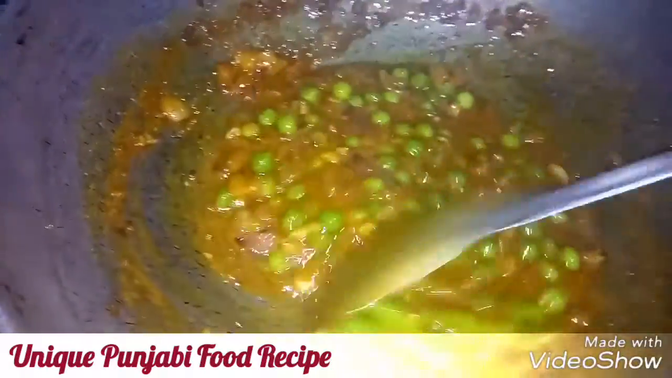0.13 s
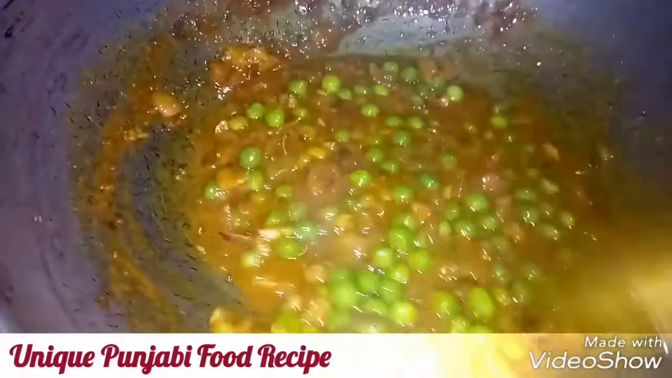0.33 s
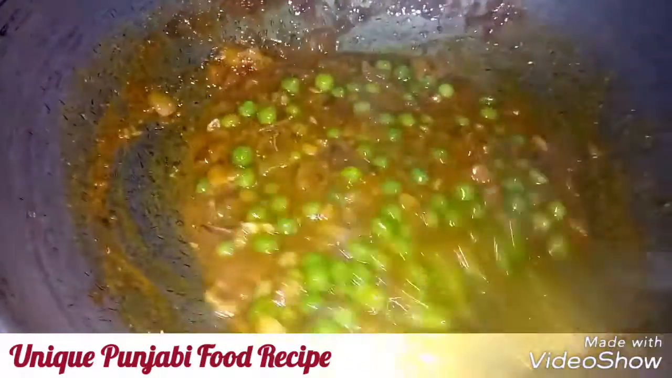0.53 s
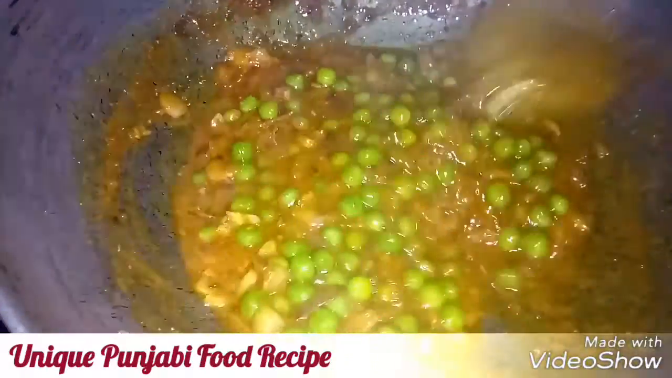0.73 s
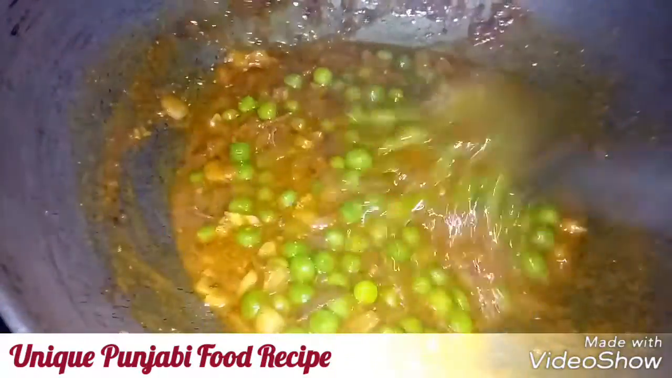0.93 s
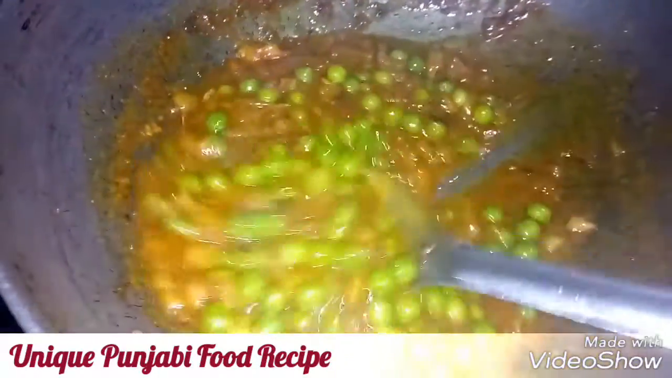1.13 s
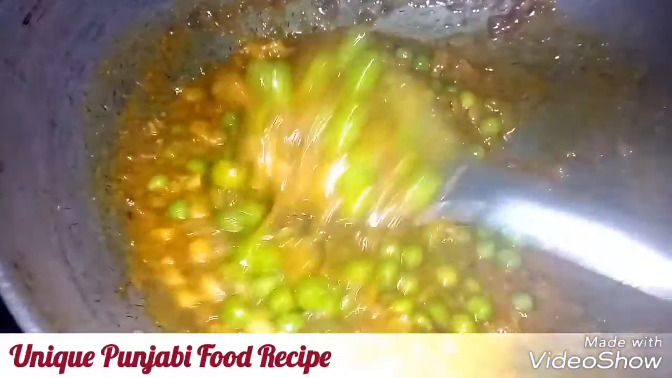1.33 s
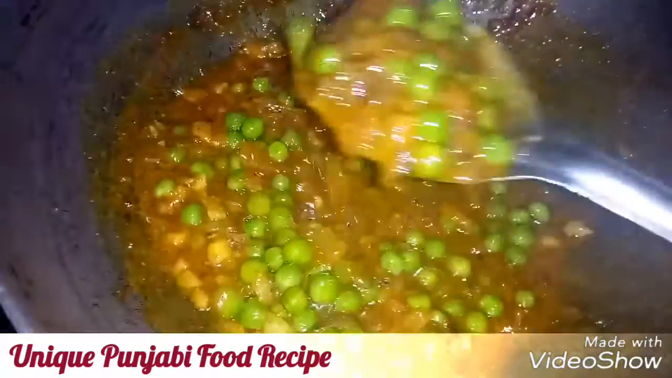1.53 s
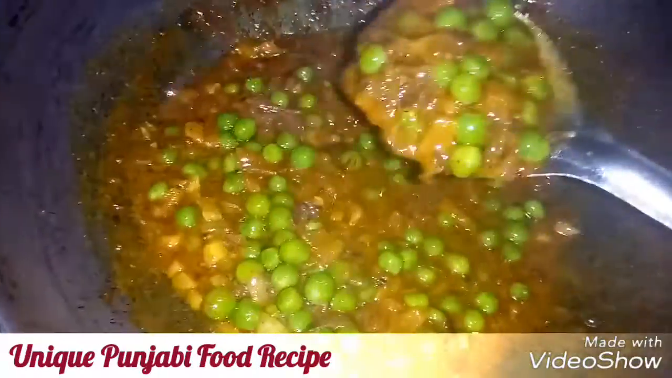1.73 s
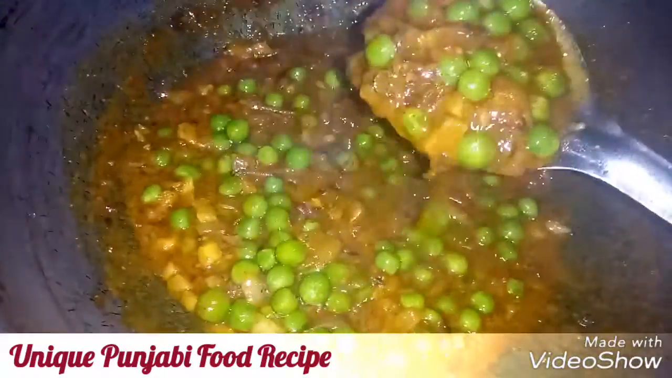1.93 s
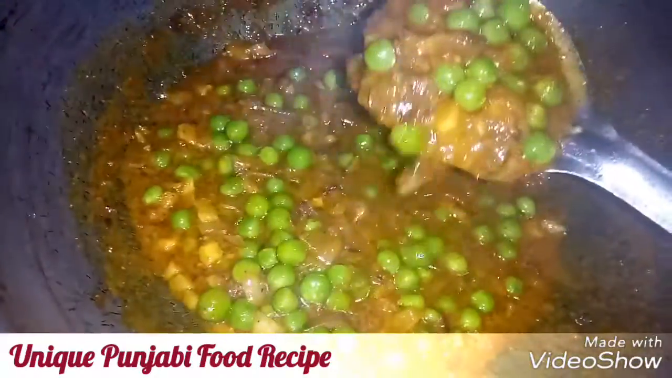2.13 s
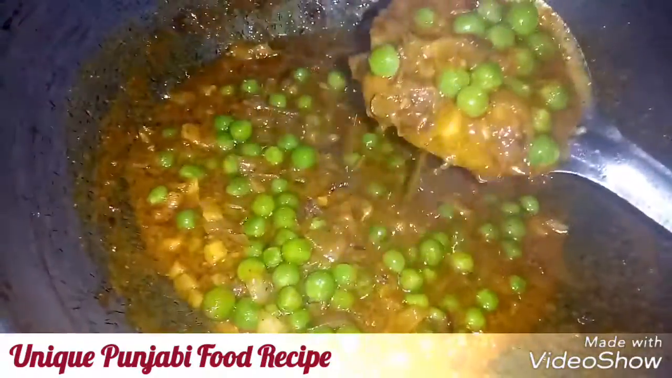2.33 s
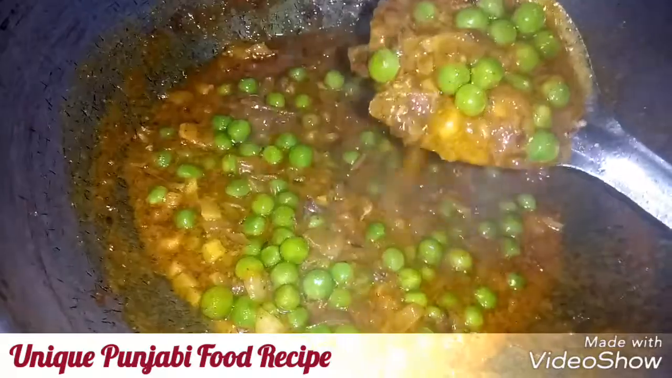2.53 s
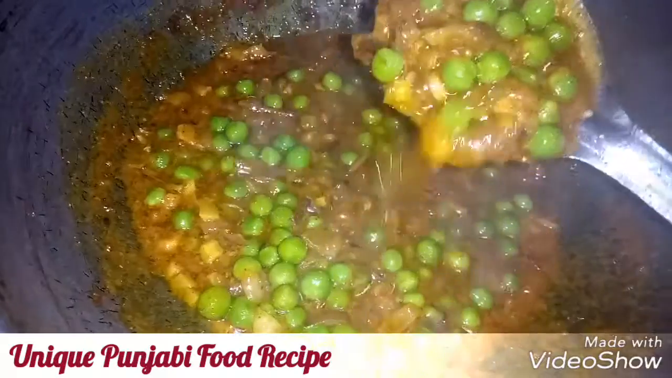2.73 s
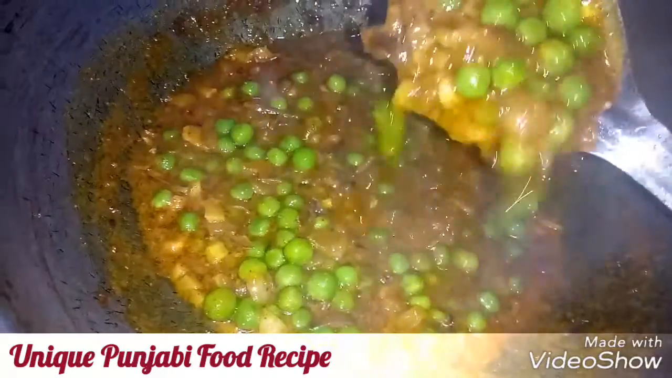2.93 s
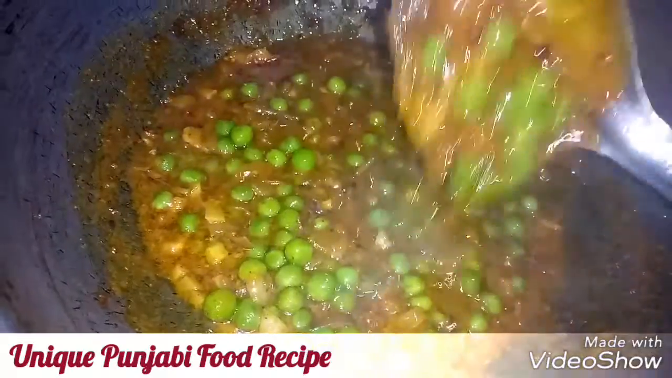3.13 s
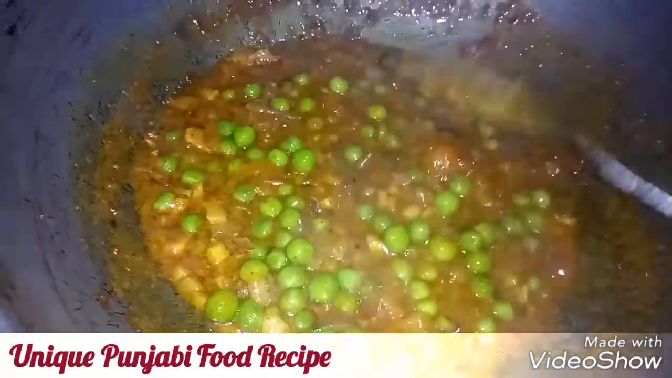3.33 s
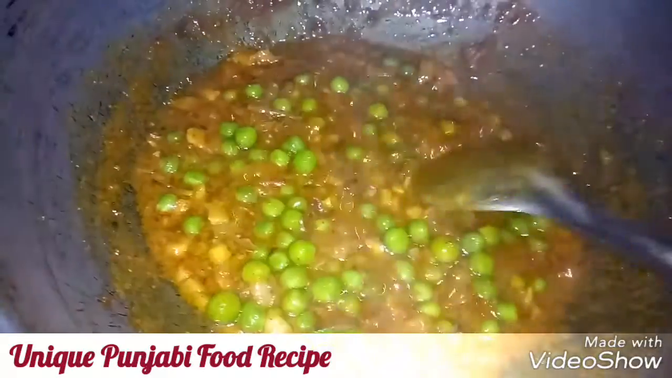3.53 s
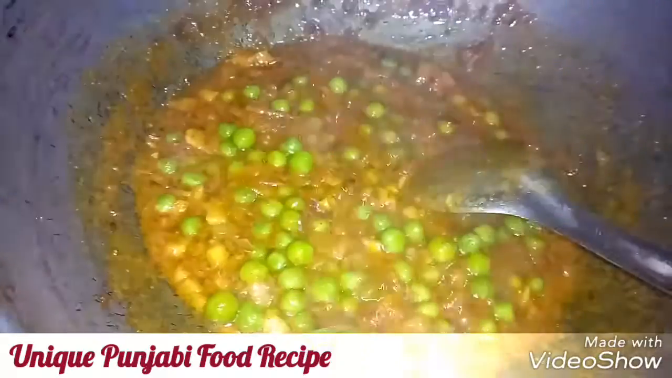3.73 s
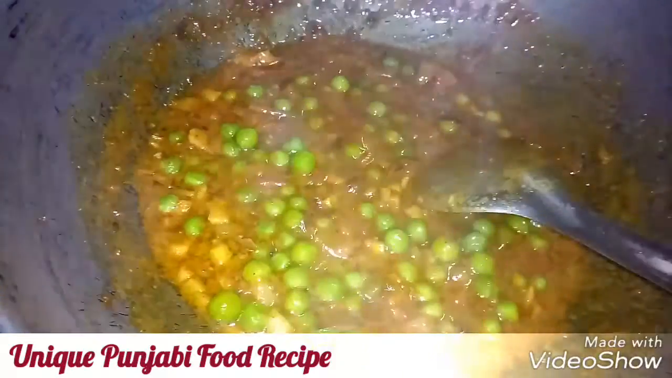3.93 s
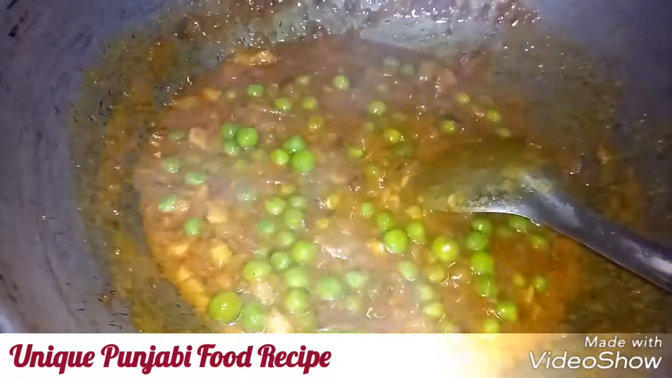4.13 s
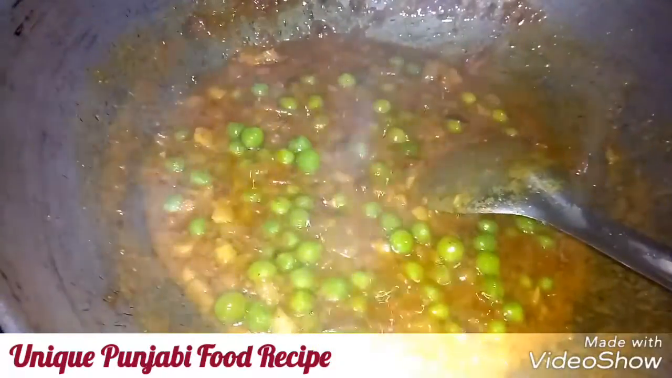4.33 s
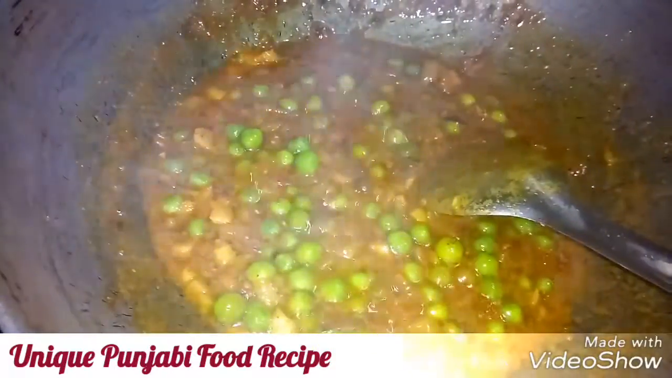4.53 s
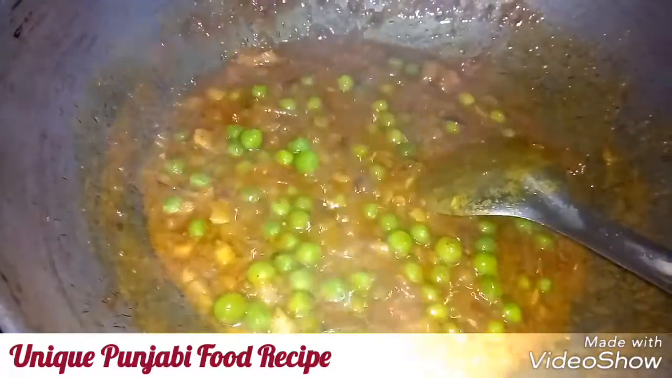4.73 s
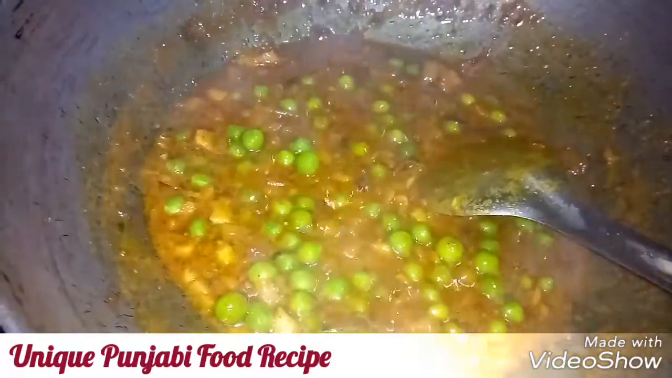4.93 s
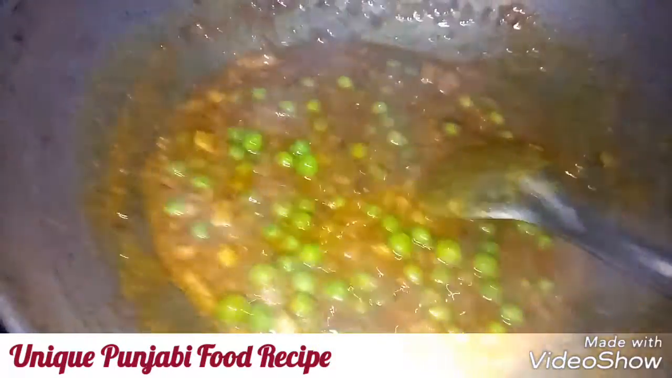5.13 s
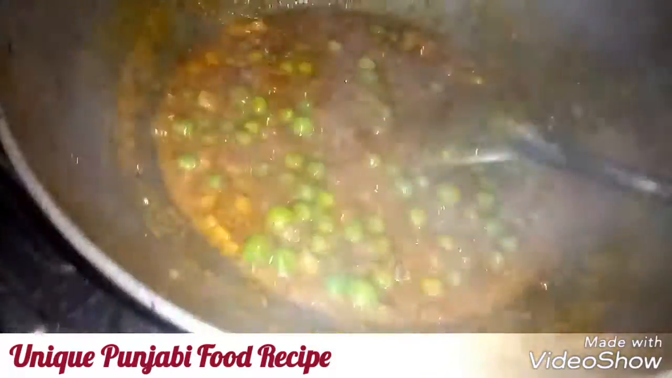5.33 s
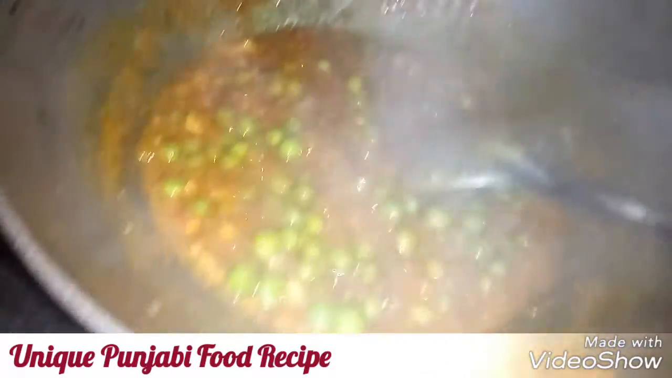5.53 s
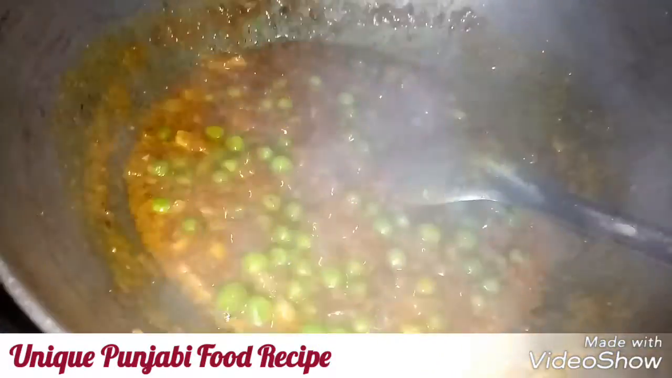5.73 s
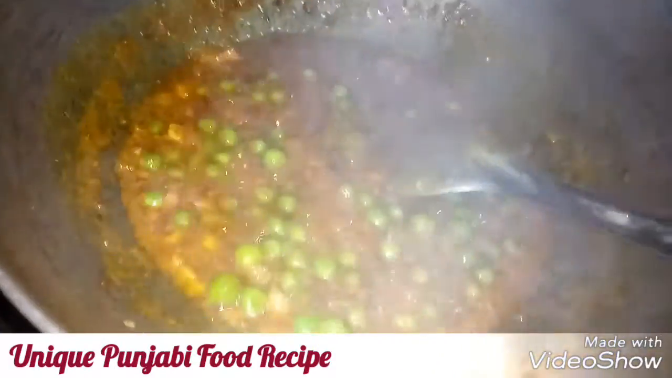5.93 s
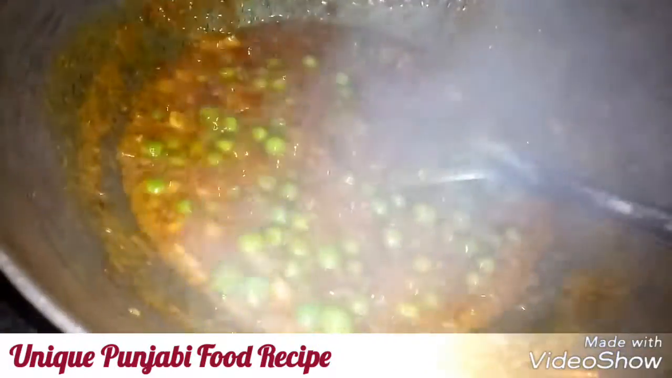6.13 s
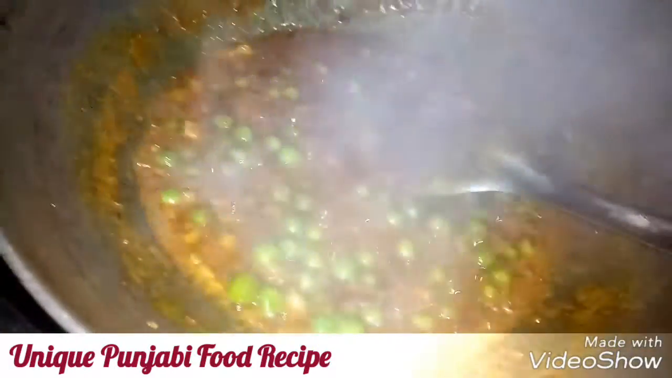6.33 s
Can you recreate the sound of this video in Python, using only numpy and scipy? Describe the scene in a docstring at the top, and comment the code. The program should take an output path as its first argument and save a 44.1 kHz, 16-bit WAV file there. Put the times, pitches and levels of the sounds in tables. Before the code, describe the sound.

Close to a metal pan in a small kitchen, a steel spoon scrapes briefly with a slight squeal, then clanks brightly and drags in gritty strokes through thick gravy. A soft sizzle swells during stirring. After a quieter pause with faint hiss, the spoon clinks down and chatters again, and wet bubbles burst and pop in quick clusters. Thin steam whistles and a low hum come near the end.

```python
"""Kitchen, close to a pan: a steel spoon knocks, chatters and scrapes on deep metal holding thick gravy.
Knocks are clicks plus decaying modes; scrapes are modes driven by gritty noise, with narrow tones and a squeal.
The gravy simmers as uneven shaped noise, swelling at moments, some of them during the stirring, with resonant
bubble bursts, pops, ticks and thin steam whistles. The room adds hiss, rumble, a low hum that comes up twice
and a short reverberation. Nearly mono: a faint grain parts the two channels."""
import sys
import numpy as np
from scipy import signal
from scipy.fft import rfft, irfft, next_fast_len
from scipy.io import wavfile
from scipy.ndimage import uniform_filter1d, map_coordinates

SR = 44100
rng = np.random.default_rng(int(sys.argv[2]) if len(sys.argv) > 2 else 0)


def to_wav(sig):
    """Store sig (one row per channel, or 1-D mono) as 16-bit WAV at the path in sys.argv[1].

    Samples outside -1..1 are clipped; the rate is SR.
    """
    pcm = np.clip(np.atleast_2d(sig), -1, 1) * 32767
    pcm = np.round(pcm).astype(np.int16)
    wavfile.write(sys.argv[1], SR, pcm.T)  # frames by channels


def gain_from_decibels(decibels):
    """Convert decibel values to linear amplitude factors."""
    exponent = np.asarray(decibels, float) / 20
    return 10 ** exponent


N = 280917
TIME = np.arange(N) / SR
LOW_MODES_TOP_HZ = 2600

# Spoon contacts. Each row: start in s, ring peak in dB, favoured pitch in Hz, t60 of the added damping in s,
# click level in dB.
CONTACTS = [(.096, -35, 5140, .05, -46), (0.106, -48, 1070, 0.063, -44), (0.134, -48, 4470, .06, -46),
            (0.6452, -15, 2357, 0.06, -43), (.6475, -16.5, 5280, 0.051, -17), (0.669, -31, 2310, .06, -31),
            (.68, -32, 3970, 0.059, -36), (.692, -35, 6160, .05, -40), (0.699, -36, 6160, .06, -38),
            (0.717, -35, 2310, .05, -39), (0.7232, -35, 1830, .06, -34), (0.727, -33, 5470, .06, -44),
            (0.742, -42, 1850, 0.035, -46), (0.9854, -33, 1465, 0.11, -39), (1.055, -44, 6300, .04, -46),
            (1.085, -44, 6000, .05, -51), (1.281, -42, 1900, 0.05, -46), (3.5975, -39, 2320, 0.04, -54),
            (3.602, -29, 2320, 0.05, -54), (3.602, -15, 5550, 0.029, -21.5), (3.61, -33, 5400, .06, -44),
            (3.616, -42, 3750, .6, -55), (3.718, -45, 920, .03, -40), (3.728, -42, 4900, .04, -44),
            (3.7332, -37, 3250, .04, -13.5), (3.736, -41, 6250, .06, -40), (3.753, -38, 3530, .04, -29)]
# Modes of spoon and pan. Each row: frequency in Hz, relative level in dB, t60 in s before the hold factor.
STEEL_MODES = [(1207, -10, 0.057), (1465, -13, 0.032), (1840, -10, 0.11), (2310, -2.5, 0.04),
               (2860, -6, 0.081), (2980, -5, 0.17), (3200, 0, 0.057), (3750, -7, 0.35), (3970, 7.5, 0.025),
               (4500, -6, 0.12), (4776, 8, 0.025), (5280, -0.5, 0.11), (5530, -13, 0.34), (5780, -13, 0.11),
               (6250, 9.5, 0.04), (6180, 2, 0.07), (6480, 6.5, 0.07), (6910, -10, 0.11), (7150, 0, 0.12),
               (7780, -11, 0.1), (8740, -7.5, 0.068), (10900, -13, 0.066), (10900, -34, 0.033),
               (13600, -16, 0.034), (14900, -31, 0.037)]
# Modes of the pan's low body. Each row: frequency in Hz, relative level in dB, t60 in s before the hold factor.
BODY_MODES = [(230.5, 4, 0.27), (306.2, 3, 0.15), (398, 6, 0.066), (500, 5, .05), (690, -1, 0.07)]


def unit(x):
    """Scaled to rms 1."""
    return x / np.sqrt(np.mean(x ** 2) + 1e-20)


def curves(rows):
    """One value per sample for each column after the time."""
    s, *cols = np.transpose(rows)
    return [np.interp(TIME, s, c) for c in cols]


def wobble(rate_hz):
    """Smooth random curve with rate_hz knots a second."""
    knots = rng.standard_normal(int(N * rate_hz / SR) + 4)
    return map_coordinates(knots, [TIME * rate_hz])


def coloured(x, spectrum):
    """x filtered by gains at (Hz, dB) points, interpolated on a log frequency axis."""
    m = next_fast_len(len(x) + 8192)
    hz, db = np.transpose(spectrum)
    gain_db = np.interp(np.log(np.fft.rfftfreq(m, 1 / SR) + 1), np.log(hz), db)
    return irfft(rfft(x, m) * gain_from_decibels(gain_db), m)[:len(x)]


def grit(spiky_db, patchy_db):
    """Noise of uneven grains, with time-frequency patches of random gain."""
    grains = rng.standard_normal(N + 512) * gain_from_decibels(spiky_db * rng.exponential(size=N + 512))
    z = signal.stft(grains, nperseg=256)[2]
    field = uniform_filter1d(uniform_filter1d(rng.standard_normal(z.shape), 4, 0), 12, 1)
    return signal.istft(z * gain_from_decibels(patchy_db * unit(field)), nperseg=256)[1][:N]


def ring(modes, weight_db=0, hold=1, phase=0):
    """Answer of a set of modes to one blow: decaying sines, t60 times hold, phase in cycles."""
    hz, db, t60 = np.transpose(modes)[:, :, None]
    t = TIME[:SR // 3]
    decay = gain_from_decibels(db + weight_db - 60 * t / (t60 * hold))
    return np.sum(decay * np.sin(2 * np.pi * (hz * t + phase)), axis=0)


def hiss():
    """Room hiss of patchy noise plus a faint, very patchy high hiss."""
    # Each row: frequency in Hz, relative density in dB.
    room_spectrum = [(120, -10.5), (200, -4.5), (303, -4.5), (408, -3), (488, -2), (1270, -2), (1430, -4),
                     (1860, -4), (7000, -46), (9100, -72.5), (15400, -120)]
    # Each row: frequency in Hz, relative density in dB.
    air_spectrum = [(6000, -38), (7500, -9), (10000, -0.5), (13500, -9), (15000, 3), (15800, -5),
                    (16500, -56)]
    room = gain_from_decibels(-66.5 + 0.47 * wobble(11.0)) * unit(coloured(grit(0, 2.45), room_spectrum))
    return room + gain_from_decibels(-94.0) * unit(coloured(grit(0, 10.0), air_spectrum))


def rumble():
    """Low noise made lumpy by two random level curves, over a slow level course."""
    # Each row: frequency in Hz, relative density in dB.
    rumble_spectrum = [(15, -44), (25, -34), (54, -1), (75, -6.5), (107, 4), (135, -5), (173, 0.5),
                       (201, -12), (241, -11.5), (303, -6), (330, -18.5), (430, -29), (730, -120)]
    # Each row: time in s, level in dB.
    rumble_course = [(0, -67), (1.4, -64.5), (2.4, -67.5), (2.9, -67), (3.25, -63.5), (3.5, -66),
                     (4.2, -67), (5.25, -62.5), (5.55, -66.5), (6.37, -68.5)]
    lumps_db = 1.2 * wobble(2.6) + 0.95 * wobble(6.5)
    noise = unit(gain_from_decibels(lumps_db) * coloured(grit(0, 0), rumble_spectrum))
    return gain_from_decibels(curves(rumble_course)[0]) * noise


def hum():
    """Low sine with a two-partial drone, gated on twice: the first stops abruptly, the second lasts to the end."""
    # Each row: start in s, rise in s, end in s, mean pitch in Hz, mean hum level in dB, drone gain in dB.
    hum_rows = [(4.9, 0.034, 5.352, 52.5, -65.5, -74), (5.4, 0.24, 6.5, 50.1, -62.5, -66)]
    cut_s = 0.0089
    turns = np.cumsum(109 + 2.48 * wobble(11)) / SR
    partials = np.sin(2 * np.pi * turns) + 0.31 * np.sin(3 * np.pi * turns)
    drone = gain_from_decibels(2.0 * wobble(12)) * partials
    out = np.zeros(N)
    for start, rise, end, hz, db, drone_db in hum_rows:
        gate = np.clip(np.minimum((TIME - start) / rise, (end - TIME) / cut_s), 0, 1) ** 2
        cycles = np.cumsum(hz + .5 * wobble(3.94)) / SR
        tone = np.sqrt(2) * gain_from_decibels(db + 0.9 * wobble(9)) * np.sin(2 * np.pi * cycles)
        out += gate * (tone + gain_from_decibels(drone_db) * drone)
    return out


def fizz():
    """Fine sizzle of gritty noise that swells unevenly."""
    # Each row: time in s, level in dB.
    fizz_course = [(0, -60), (.2, -69), (.62, -68), (.83, -62.5), (1.03, -69), (1.21, -55), (1.5, -64.5),
                   (1.95, -68), (3.2, -65.5), (3.64, -65.5), (3.78, -73), (3.9, -62.5), (5.5, -63.5),
                   (6.37, -65)]
    # Each row: frequency in Hz, relative density in dB.
    fizz_spectrum = [(1060, -39), (1800, -7), (2060, -1.5), (3130, 0.5), (4350, 0.5), (5510, 0),
                     (6370, -2.5), (8140, -21.5), (13500, -29.5), (15100, -18), (15800, -40)]
    swell = gain_from_decibels(.5 * wobble(12) + 1.1 * wobble(40))
    return gain_from_decibels(curves(fizz_course)[0]) * unit(swell * coloured(grit(1.8, 1.6), fizz_spectrum))


def wet_resonance(puff, hz):
    """Spiky noise narrowed to a peak at hz, as a bursting bubble sounds."""
    peak = [(hz * .6, -70), (hz * .85, -16), (hz, 0), (hz * 1.15, -16), (hz * 1.4, -70)]
    return unit(coloured(puff, peak))


def bursts():
    """Runs of bubbles bursting in the gravy: spiky noise through two wet resonances, plus a broad splash."""
    # The loudest runs. Each row: start in s, length in s, level before shaping in dB,
    # low resonance in Hz, high resonance in Hz.
    loud_runs = [(0.267, 0.025, -69, 2700, 4860), (2.53, 0.058, -73, 3450, 4800),
                 (3.829, 0.048, -65, 3050, 4850), (3.926, 0.05, -61.5, 3280, 5530),
                 (4.005, 0.08, -68, 3120, 5800), (4.125, 0.049, -60, 3130, 6060),
                 (4.282, 0.052, -64, 3420, 5950), (4.408, .03, -66, 3130, 5250),
                 (4.48, 0.027, -70, 2740, 4800), (4.578, 0.045, -62, 3600, 4900),
                 (4.755, .035, -67, 4200, 5600), (4.32, .04, -70, 2900, 6200),
                 (4.658, 0.028, -65, 3960, 5400), (4.846, 0.13, -67, 3000, 5100),
                 (4.95, 0.038, -70, 3260, 5300), (5.035, 0.15, -66.5, 3200, 5430),
                 (5.31, 0.034, -67.5, 3500, 6340), (5.41, .035, -70, 3250, 3600),
                 (5.872, .02, -70, 3350, 4470)]
    # Each row: frequency in Hz, relative density in dB.
    splash_spectrum = [(1500, -48), (2500, 4), (6500, 13), (7600, -8), (16000, -43)]
    high_over_low_db, flutter_db = -0.5, 2
    # smaller runs at random times as the spoon comes to rest and after
    from_s, to_s = 3.85, 5.9
    small_runs = [(from_s + a * (to_s - from_s), 0.033 * (0.61 + b), -74,
                   3350 * (0.77 + 0.18 * c), 5100 * (0.96 + 0.4 * d))
                  for a, b, c, d in rng.random(size=(12, 4))]
    out, t = np.zeros(N + SR), TIME[:SR // 8]
    flutter = np.pad(gain_from_decibels(flutter_db * wobble(260)), (0, SR))
    for s, length, db, low_hz, high_hz in loud_runs + small_runs:
        on = slice(round(s * SR), round(s * SR) + len(t))
        puff = rng.standard_normal(len(t)) * gain_from_decibels(3.2 * rng.exponential(size=len(t)))
        splash = 0.46 * unit(coloured(puff, splash_spectrum))
        low, high = wet_resonance(puff, low_hz), wet_resonance(puff, high_hz)
        voice = splash + low + gain_from_decibels(high_over_low_db) * high
        shape = np.sin(np.pi * np.clip(t / length, 0, 1) ** 0.63) ** 0.87 * flutter[on]
        out[on] += gain_from_decibels(db) * abs(shape) * voice
    return out[:N]


def pops():
    """Single pops: very short sine pulses."""
    # Each row: start in s, envelope peak in dB, pitch in Hz.
    pop_rows = [(3.334, -46, 5000), (3.412, -45, 2100), (3.449, -54, 2500), (4.136, -54, 6110),
                (4.2923, -48.5, 3550), (3.9375, -48, 5350), (4.678, -49, 5200), (4.728, -52, 5300),
                (4.8465, -52, 4500), (4.299, -54, 6000), (4.3126, -50, 6100), (4.5832, -45, 4800),
                (4.9078, -53, 3200), (5.0617, -49, 5530), (5.08, -41, 3060), (5.095, -44, 3500),
                (5.1327, -47, 5590)]
    to_peak_s = 0.0004
    out, t = np.zeros(N + SR), TIME[:SR // 8]
    envelope = t / to_peak_s * np.exp(1 - t / to_peak_s)
    for s, db, hz in pop_rows:
        out[round(s * SR):][:len(t)] += gain_from_decibels(db) * envelope * np.sin(2 * np.pi * hz * t)
    return out[:N]


def ticks():
    """Thin high ticks: millisecond puffs of treble noise."""
    # Each row: start in s, peak in dB.
    tick_rows = [(3.053, -49), (3.3343, -58)]
    spectrum = [(9000, -40), (13000, -6), (15000, -2), (16400, -6), (16800, -60)]
    out, t = np.zeros(N + SR), TIME[:SR // 8]
    for s, db in tick_rows:
        noise = coloured(rng.standard_normal(len(t)), spectrum)
        tick = np.exp(-((t - .002) / 0.0011) ** 2) * noise
        out[round(s * SR):][:len(t)] += gain_from_decibels(db) * tick / abs(tick).max()
    return out[:N]


def wheezes():
    """Narrow unsteady whistles that slide as steam escapes."""
    # Each row: start in s, end in s, first pitch in Hz, last pitch in Hz, level before flutter in dB.
    wheeze_rows = [(5.53, 5.6, 4450, 4700, -71), (5.595, 5.69, 4100, 3950, -70),
                   (5.705, 5.74, 3700, 3450, -72)]
    out, waver, flutter = np.zeros(N), wobble(120), wobble(90)
    for start, end, from_hz, to_hz, db in wheeze_rows:
        u = np.clip((TIME - start) / (end - start), 0, 1)
        hz = from_hz + (to_hz - from_hz) * u + 70 * waver
        shape = gain_from_decibels(db + 4 * flutter) * np.sin(np.pi * u) ** .5
        out += shape * np.sin(2 * np.pi * np.cumsum(hz) / SR)
    return out


def walls(x):
    """Room answer: noise whose frequencies each die at their own speed, 200 samples late."""
    # Each row: frequency in Hz, t60 in s.
    wall_decay = [(300, 0.25), (3000, 0.44), (10000, 0.051)]
    hz, t, z = signal.stft(rng.standard_normal(SR // 2), SR, nperseg=256)
    t60 = np.interp(hz, *np.transpose(wall_decay))[:, None]
    tail = signal.istft(z * gain_from_decibels(-60 * t / t60), SR, nperseg=256)[1]
    return signal.fftconvolve(np.pad(x, (200, 0)), tail / np.linalg.norm(tail))[:N]


def squeal():
    """The handle sings in the first stroke: a rough tone that sags in pitch."""
    # Each row: time in s, mean pitch in Hz, level before roughness in dB.
    squeal_course = [(0, 1180, -53), (.05, 1200, -55), (.08, 1080, -54), (.088, 1070, -66),
                     (.105, 1030, -51), (.122, 1030, -53), (.14, 1006, -75)]
    hz, db = curves(squeal_course)
    cycles = np.cumsum(hz + 75 * wobble(130)) / SR
    return (TIME < squeal_course[-1][0]) * gain_from_decibels(db + 4 * wobble(90)) * np.sin(2 * np.pi * cycles)


def narrow_tones():
    """Narrow fluttering tones, mostly modes of the dragged edge, some thin treble lines, one late over the simmer."""
    # Each row: start in s, start of the fade in s, mean pitch in Hz, level before flutter in dB.
    tone_rows = [(0, 0.087, 6170, -61), (.04, 0.078, 5640, -55.5), (0, .06, 4930, -59),
                 (.04, 0.154, 315.4, -64), (.097, 0.15, 6080, -50), (.128, .15, 4460, -56),
                 (.125, 0.143, 4820, -56), (.669, .675, 2310, -44), (.681, .691, 2300, -43),
                 (.7, .721, 2280, -44), (.7, .72, 3200, -50), (.695, .72, 1570, -48),
                 (.669, .695, 5230, -46), (.68, .703, 3980, -44.5), (.69, 0.72, 6250, -46),
                 (.705, 0.739, 1105, -49.5), (.722, 0.732, 1800, -42), (.724, 0.739, 5620, -42),
                 (.722, 0.739, 4920, -46), (.76, 0.807, 4850, -59), (.982, 1.065, 236, -64.5),
                 (1, 1.025, 390, -67), (1.275, 1.29, 210, -62), (1.16, 1.178, 308, -63),
                 (3.63, 3.69, 980, -67), (3.61, 3.67, 2300, -62), (3.64, 3.71, 5500, -62),
                 (.13, .15, 4050, -58), (.095, .115, 4900, -58), (.01, .05, 3070, -58),
                 (1.1, 1.3, 231.3, -64), (1.06, 1.1, 6070, -62), (1.19, 1.264, 4700, -61),
                 (1.2, 1.26, 2130, -64), (1.3, 1.358, 1902, -66), (1.32, 1.35, 5600, -63),
                 (3.617, 3.68, 3750, -57), (3.72, 3.76, 10900, -69), (3.715, 3.76, 9100, -71),
                 (.655, .745, 10800, -66), (4.87, 4.99, 3250, -70), (3.63, 3.65, 2990, -61),
                 (3.61, 3.645, 5360, -55), (3.665, 3.717, 6240, -59), (3.66, 3.71, 4500, -64),
                 (3.728, 3.745, 6240, -48), (3.735, 3.743, 5740, -43)]
    rise_s, t60_s, flutter_db = 0.0016, .04, 3.5
    out, t = np.zeros(N + SR), TIME[:SR // 2]
    for start, end, hz, db in tone_rows:
        flutter, waver = map_coordinates(rng.standard_normal(300), [[t * 220, 130 + t * 300]])
        fall_db = 60 * np.maximum(t - end + start, 0) / t60_s
        shape = np.clip(t / rise_s, 0, 1) * gain_from_decibels(db + flutter_db * flutter - fall_db)
        waver_share = .011 * np.sqrt(2000 / hz) * min(hz / 1000, 1)
        cycles = np.cumsum(hz * (1 + waver_share * waver)) / SR
        out[round(start * SR):][:len(t)] += np.sqrt(2) * shape * np.sin(2 * np.pi * cycles)
    return out[:N]


def bite():
    """Gain of the drag: a jump at every contact that slackens until the next, on an uneven surface."""
    jump_db, life_s, grain_db = 6, .005, 2
    s = np.array([0] + [row[0] for row in CONTACTS])
    since = TIME - s[np.searchsorted(s, TIME, side="right") - 1]
    return gain_from_decibels(jump_db * np.exp(-since / life_s) + grain_db * wobble(200))


def driven(modes, hold, drift_db=3):
    """Each mode kept ringing by its own stick-slip grit, its strength drifting as the contact moves."""
    voices = []
    for mode in modes:
        sound = signal.fftconvolve(grit(1.5, 0), ring([mode], hold=hold))[:N]
        voices.append(gain_from_decibels(drift_db * wobble(14)) * sound)
    return np.array(voices)


def band_grit(low_hz, high_hz):
    """Gritty noise in one band, rms 1."""
    spectrum = [(low_hz * .8, -30), (low_hz, 0), (high_hz, 0), (high_hz * 1.2, -30)]
    return unit(coloured(grit(2, 2), spectrum))


def body_drone():
    """The pan body drones while the spoon bears on it."""
    # Each row: start in s, end in s, level before the bite gain in dB.
    press_rows = [(0, 0.12, -57.5), (0.658, 0.754, -68), (0.979, 1.05, -65), (1.1, 1.29, -63),
                  (3.6, 3.67, -65), (3.716, 3.763, -70)]
    rise_s, t60_s = 0.0094, 0.34
    gain = np.zeros(N)
    for start, end, db in press_rows:
        fall_db = 60 * np.maximum(TIME - end, 0) / t60_s
        gain += gain_from_decibels(db - fall_db) * np.clip((TIME - start) / rise_s, 0, 1)
    return gain * unit(driven(BODY_MODES, 0.99, drift_db=-1.8).sum(0))


def scrapes():
    """The dragged edge favours modes near a moving pitch; spoon bowl, handle and pan body rasp along."""
    # One list a stroke. Each row: time in s, edge level before the bite gain in dB, favoured pitch in Hz,
    # duller parts over the edge level in dB, before their shares.
    stroke_courses = [
        [(0, -50, 6200, -5), (.04, -50.5, 6240, -1), (.071, -48, 5590, -1), (.089, -59, 5400, 9),
         (.106, -47.5, 5970, 8.5), (.138, -45.5, 5820, -11), (.168, -65, 5630, 16.5), (.24, -73, 5180, -10)],
        [(.666, -60, 4960, -6), (.669, -44, 4960, -6), (.677, -49, 5000, -6), (.684, -43.5, 4500, -6),
         (.718, -42, 5300, -6), (.74, -41.5, 5470, -6), (.752, -50, 5000, -4), (.775, -55, 5000, -3),
         (.832, -54.5, 5700, -10), (.97, -77.5, 4570, 7)],
        [(1, -65, 5840, 2), (1.04, -65, 6000, 8), (1.055, -55.5, 6400, -4), (1.09, -51, 6150, -9),
         (1.177, -53, 4760, -5), (1.253, -52.5, 4760, 4), (1.3, -64, 5200, 6), (1.328, -52, 5350, -6),
         (1.408, -70, 5670, 9), (1.6, -82, 4200, 17)],
        [(3.605, -40, 5400, -8), (3.613, -41, 5400, -6), (3.63, -53.5, 5650, -3), (3.658, -57.5, 5140, 7),
         (3.7, -54.5, 5650, -5), (3.723, -54, 4440, 7), (3.729, -44, 5000, 2.5), (3.736, -39, 5800, 0),
         (3.742, -44, 5800, 0), (3.748, -50, 5000, 2), (3.755, -44, 5000, 2), (3.767, -52, 4970, 2),
         (3.827, -59, 5000, 1), (3.9, -62.5, 5260, -9)],
    ]
    # Shares of the duller parts, one row a stroke. Each row: spoon bowl in dB, handle in dB.
    dull_shares = [(-20, -11.5), (5, -3), (-10, -12), (-11, -17.5)]
    # Broad contact noise. Each row: frequency in Hz, relative density in dB.
    rasp_spectrum = [(350, -33), (600, 3.5), (697, 8), (757, -1.5), (1650, 1), (1840, 4), (2590, 3),
                     (5980, 9.5), (7400, -2), (8420, -13), (9390, -13), (13400, -30), (15000, -17),
                     (15800, -35)]
    high = [m for m in STEEL_MODES if LOW_MODES_TOP_HZ < m[0] < 8000]
    bowl_modes = [m for m in STEEL_MODES if 1600 < m[0] < LOW_MODES_TOP_HZ]
    handle_modes = [m for m in STEEL_MODES if m[0] < 1600]
    edge = unit(driven(high, .7)) / np.sqrt(len(high))
    edge_hz = np.transpose(high)[0][:, None]
    rasp = .8 * unit(coloured(grit(2.5, 2.5), rasp_spectrum))
    bowl = unit(unit(driven(bowl_modes, .45).sum(0)) + 1.1 * band_grit(1500, 2700))
    handle_tone = unit(driven(handle_modes, 0.19, drift_db=-1.0).sum(0))
    handle = unit(handle_tone + 0.63 * band_grit(560, 1420))
    out = body_drone()
    for stroke, (bowl_db, handle_db) in zip(stroke_courses, dull_shares):
        on = slice(round(stroke[0][0] * SR), round(stroke[-1][0] * SR))
        db, hz, dull_db = (c[on] for c in curves(stroke))
        near = np.exp(-(np.log2(edge_hz / hz) / .13) ** 2)
        steel = np.sum(gain_from_decibels(16.4 * near - 14.0) * edge[:, on], axis=0)
        dull = gain_from_decibels(bowl_db) * bowl[on] + gain_from_decibels(handle_db) * handle[on]
        out[on] += gain_from_decibels(db) * (steel + rasp[on] + gain_from_decibels(dull_db) * dull)
    return out


def knocks():
    """Each contact clicks and favours modes near one pitch; the food soon damps most of the ring."""
    focus_db, dull_focus_db, dull_below_hz = 16.0, 9.5, 1600
    low_even_hz, low_db_per_octave, low_most_db = 2700, -20, 5.5
    free_db, free_hold = -28, 1.8  # the part that rings on freely
    crack_db, crack_t60_s = -35, 0.029
    crack_spectrum = [(7000, -13), (9000, 2), (14500, 11), (16000, -18)]
    out, t = np.zeros(N + SR), TIME[:SR // 3]
    mode_hz = np.transpose(STEEL_MODES)[0][:, None]
    for s, db, hz, t60, click_db in CONTACTS:
        chance = rng.standard_normal((len(STEEL_MODES), 1))
        phase = rng.random((len(STEEL_MODES), 1))
        dull = hz < dull_below_hz
        near = np.exp(-(np.log2(mode_hz / hz) / .13) ** 2)
        # the higher a contact's pitch, the less it stirs the low modes
        low_db = min(low_db_per_octave * np.log2(hz / low_even_hz), low_most_db)
        weight_db = (focus_db + dull_focus_db * dull) * near
        weight_db = weight_db + low_db * (mode_hz < LOW_MODES_TOP_HZ) + 0.38 * chance
        damped = ring(STEEL_MODES, weight_db, 0.69, phase) * gain_from_decibels(-60 * t / max(t60, .005))
        free = gain_from_decibels(free_db) * ring(STEEL_MODES, weight_db, free_hold, phase)
        steel = (damped + free) * (1 - np.exp(-t / 0.00027)) ** 2
        if dull:  # flat contacts thump the pan body
            thump = ring(BODY_MODES, hold=0.63) / len(BODY_MODES)
            steel += gain_from_decibels(-17.5) * abs(steel).max() * thump
        noise = unit(coloured(rng.standard_normal(len(t)), crack_spectrum))
        crack = gain_from_decibels(crack_db - 60 * t / crack_t60_s) * noise
        cycles = 1.5 - hz * t
        # the 0.14 cycle lean makes the first swing the larger
        click = np.exp(-(cycles / .62) ** 2) * np.sin(2 * np.pi * (cycles + .14))
        blow = gain_from_decibels(db) * (steel / abs(steel).max() + crack) + gain_from_decibels(click_db) * click
        out[round(s * SR):][:len(t)] += blow
    return out[:N]


def scene():
    """Kitchen, gravy and spoon, with the spoon's room answer, alike in both channels."""
    kitchen = hiss() + rumble() + hum()
    gravy = fizz() + bursts() + pops() + ticks() + wheezes()
    spoon = knocks() + bite() * scrapes() + narrow_tones() + squeal()
    mono = spoon + gain_from_decibels(-17.5) * walls(spoon) + gravy + kitchen
    return np.array([mono, mono])


def band_limit(x):
    """A steep low-pass at the top of the band."""
    return signal.sosfilt(signal.butter(12, 16480, fs=SR, output="sos"), x)


def record(dry):
    """The channels differ by a faint opposed grain that follows the sound band by band."""
    # Each row: frequency in Hz, grain gain in dB.
    grain_spectrum = [(60, -22), (200, -20), (400, -19), (700, -14), (1300, -20), (4400, -19.5),
                      (8000, -14), (15000, -14)]
    follows, even_db = .85, -95  # grain grows as sound ** follows; even_db is the reference per band
    z = signal.stft(dry[0], nperseg=512)[2]
    z = z * (abs(z) / gain_from_decibels(even_db) + 1e-9) ** (follows - 1)
    grain = signal.istft(z * rng.standard_normal(z.shape), nperseg=512)[1][:N]
    apart = coloured(grain, grain_spectrum)
    return band_limit(dry + [apart, -apart])


dry = scene()
out = record(dry)
to_wav(out)
```